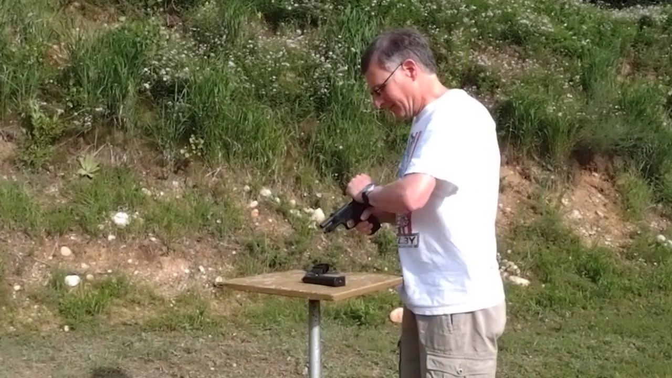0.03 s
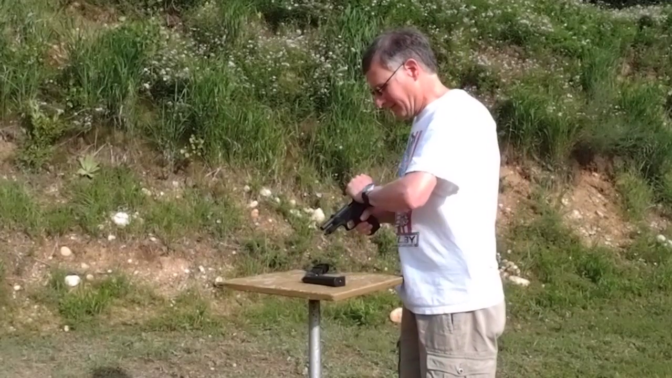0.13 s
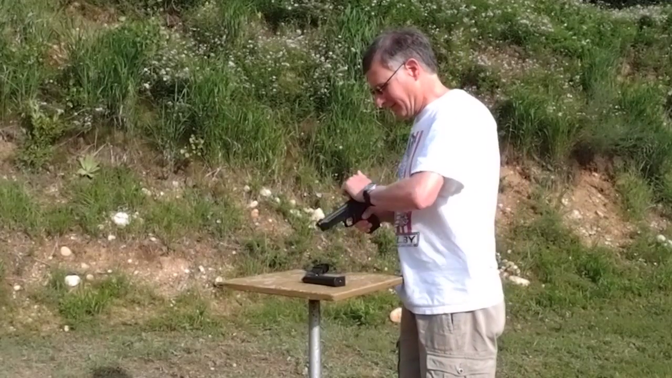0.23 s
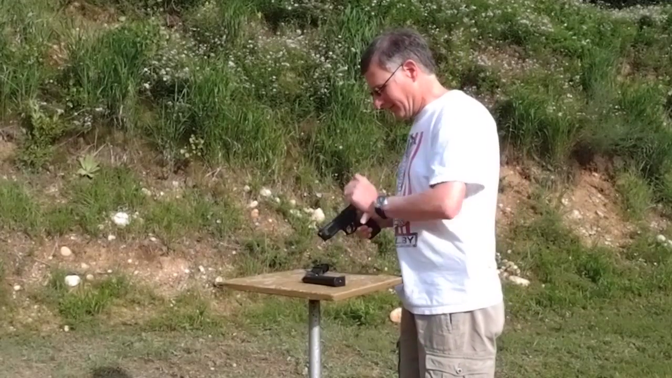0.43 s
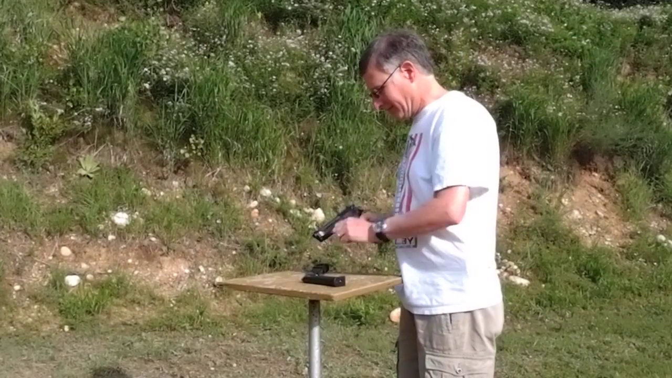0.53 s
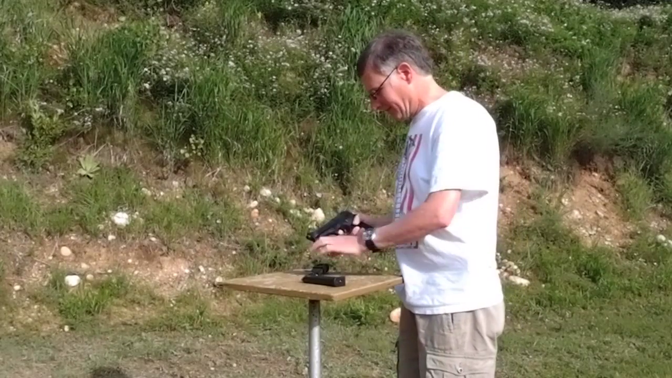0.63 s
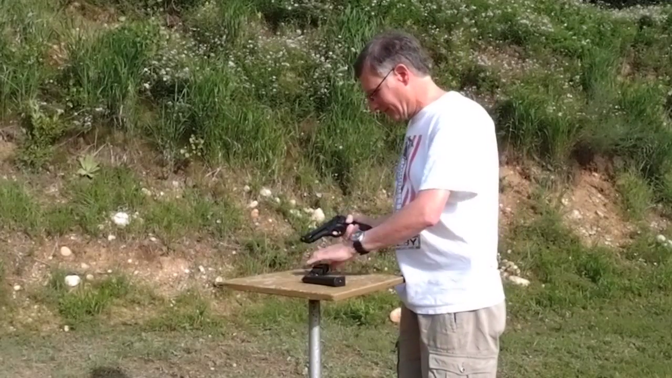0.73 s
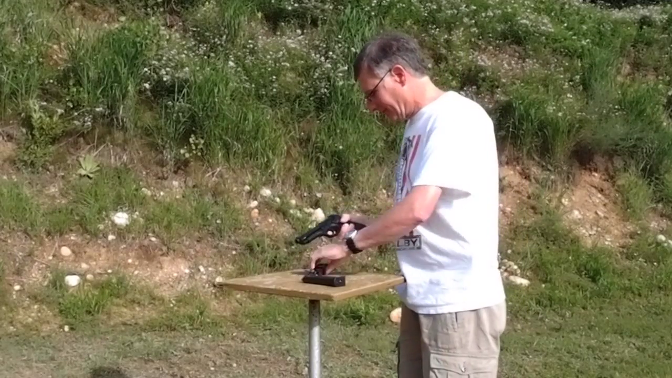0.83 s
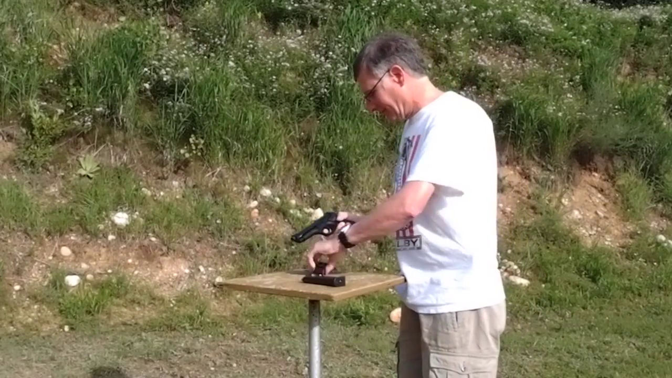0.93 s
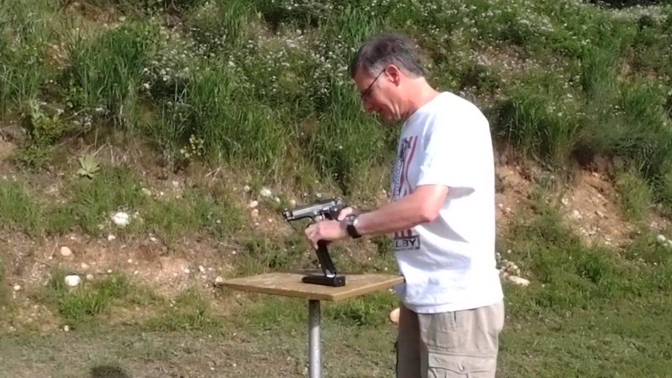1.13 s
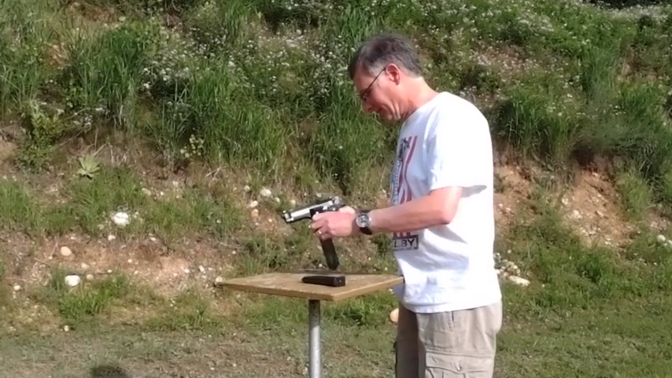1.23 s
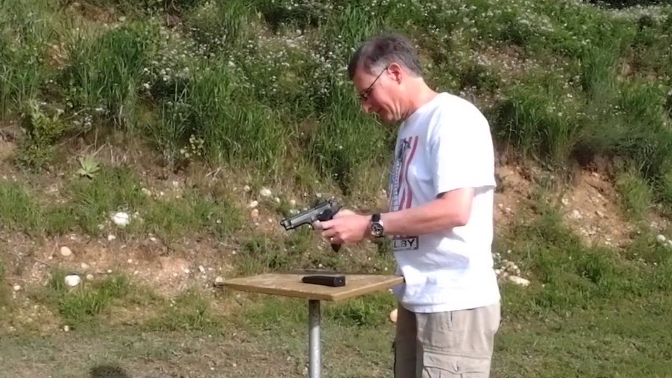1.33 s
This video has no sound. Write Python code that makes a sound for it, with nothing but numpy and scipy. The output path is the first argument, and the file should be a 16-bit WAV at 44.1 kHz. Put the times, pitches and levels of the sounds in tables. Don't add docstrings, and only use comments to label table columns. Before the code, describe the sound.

A pistol slide scrapes briefly and slams shut with a hard, bright metal clack, close to a hand-held microphone outdoors; faint finger ticks and a bird chirp come before, hiss and light wind throughout.

```python
import sys
import numpy as np
from scipy import signal
from scipy.fft import rfft, irfft
from scipy.io import wavfile

SR = 44100
rng = np.random.default_rng(int(sys.argv[2]) if len(sys.argv) > 2 else 0)


def dump_mix(stems):
    frames = np.atleast_2d(stems).T
    limited = np.clip(frames, -1, 1)
    pcm = np.round(limited * 32767).astype(np.int16)
    wavfile.write(sys.argv[1], SR, pcm)


def attenuation_scalar(level_db):
    decades = np.asarray(level_db, float) / 20
    return 10 ** decades


N = 61740

# frequency in Hz, level in dB per Hz.
HISS_COLOUR = [(590, -35.5), (1000, -10), (2260, -6), (6480, -10.5), (9500, -20), (11800, -23),
               (14500, -15), (16000, -13.5)]
# frequency in Hz, level in dB.
HUM_TONES = [(52, -69), (15481, -80.5), (15734, -84)]
# frequency in Hz, level in dB per Hz.
WIND_COLOUR = [(18, -34.5), (30, 2.5), (131, -1), (390, -7), (473, -3.5), (535, -8), (748, -8), (2000, -19),
               (2600, -50), (4400, -120)]
# time in seconds, level in dB.
GUST = [
    (0.0, -61),
    (0.42, -62),
    (0.626, -60),
    (1.044, -57.5),
    (1.4, -60),
]
# start in seconds, length in seconds, start pitch in Hz, end pitch in Hz, level in dB.
CHIRPS = [
    (.122, .012, 3250, 3400, -62),
    (.137, .018, 3700, 3900, -57),
    (.167, .024, 4750, 4680, -60),
]
# start in seconds, length in seconds, start pitch in Hz, end pitch in Hz, level in dB.
HOOT = (1.078, .08, 478, 474, -56)
# delay in seconds, level in dB.
SCATTER = [(.004, -41), (.02, -55.5), (0.044, -53.5), (.054, -49.5), (.075, -56.5), (.14, -61),
           (.19, -71.5), (.21, -66), (0.227, -69), (.25, -75), (.4, -91.5)]
# frequency in Hz, level in dB.
RETURN_COLOUR = [(800, -11), (1700, -10), (2300, -1.5), (4500, -3), (6500, 0.5), (9500, -1), (12500, 1.5),
                 (16000, -1)]
# frequency in Hz, level in dB.
EARLIER_COLOUR = [(1500, -15.5), (2500, -1.5), (4300, -3), (6200, 0.5), (9300, -5), (11500, 0.5),
                  (16000, -2)]
# start in seconds, level in dB, centre in Hz, width in Hz, length in seconds.
TICKS = [(.0480, -45, 2350, 1500, 0.0027), (0.0625, -41.5, 2480, 695, 0.0013),
         (.0740, -40.5, 1253, 149, 0.0016), (0.0744, -41.5, 1540, 150, .002),
         (.0750, -48.5, 3300, 1500, 0.0012), (0.1063, -41, 3400, 1820, .0015),
         (.1070, -47, 1230, 199.8, .003), (.1120, -41, 2430, 1500, .0015), (0.197, -32, 2330, 702, 0.0012),
         (.1972, -33.5, 5460, 4000, .001), (0.2, -42, 2300, 300, 0.0039), (0.2167, -13.5, 3650, 900, .0008),
         (0.2192, -22, 13900, 2000, 0.0019), (.2272, 8.5, 4600, 890, 0.00071),
         (.2350, -12, 2700, 890, .0015), (.9898, -42.5, 6320, 1500, .001), (.9905, -46, 3360, 1785, 0.0023),
         (.9898, -47.5, 12820, 3480, .001), (0.9956, -44, 3160, 2500, .003), (1.081, -55, 2494, 2500, .003),
         (0.988, -47, 1100, 1200, 0.0029), (0.237, -26.5, 500, 501, 0.0013)]
# time in seconds, level in dB.
SCRAPE = [
    (.188, -76),
    (0.192, -52),
    (0.206, -51.5),
    (0.213, -48),
    (.218, -38),
    (0.225, -42.5),
    (.228, -75.5),
]
# start in seconds, level into the frame in dB, level into the slide in dB,
# bare crack in dB, contact length in seconds.
CONTACTS = [
    (.2144, -40.5, -61.5, -33, 0.0012),
    (.2172, -26.5, -47, -31.5, 0.002),
    (.2184, -20, -41.5, -22.5, .0014),
    (.2215, -24, -48.5, -34, .0015),
    (.2272, -4, -12.5, 1, 0.0011),
    (.2300, -16.5, -20, -11.5, 0.0013),
    (.2347, -12, -33.5, -18.5, 0.0023),
    (.2387, -11.5, -3, -5.5, .0009),
    (.2420, -24, -24.5, -16.5, .0015),
    (.2447, -27, -14, -19, .0012),
]
# frequency in Hz, level in dB, 60 dB decay in seconds.
FRAME_MODES = [(1070, -17, .025), (1278, -16.5, 0.09), (1550, -20.5, 0.072), (1840, -22.5, 0.02),
               (2470, -9, 0.022), (2700, -9, 0.014), (3300, -7.5, .014), (3686, -0.5, 0.01),
               (4510, -4.5, .014), (4465, -1.5, 0.013), (5030, -1, .012), (4972, -5, 0.004),
               (5838, -8, 0.016), (6720, -15, .012)]
# frequency in Hz, level in dB, 60 dB decay in seconds.
SLIDE_MODES = [(7310, -13.5, .02), (8092, -6.5, 0.063), (8670, -8.5, .02), (10900, -13.5, .015),
               (11093, -3, 0.02), (11340, -3, 0.016), (12250, -4.5, 0.027), (13300, -8.5, 0.025),
               (14570, -10.5, 0.021)]
# centre in Hz, width in Hz.
NOTCHES = [(5250, 160), (7750, 80)]


def rms_one(x):
    return x / np.sqrt(np.mean(x ** 2) + 1e-20)


def cut(x, hz, kind, order=2):
    return signal.sosfilt(signal.butter(order, hz, kind, fs=SR, output="sos"), x)


def coloured(points):
    hz, db = np.transpose(points)
    grid = np.maximum(np.fft.rfftfreq(N, 1 / SR), 1)
    gain = attenuation_scalar(np.interp(np.log(grid), np.log(hz), db))
    return rms_one(irfft(rfft(rng.standard_normal(N)) * gain, N))


def drift(rate_hz):
    r = np.exp(-2 * np.pi * rate_hz / SR)
    slow = signal.lfilter([1], [1, -2 * r, r * r], rng.standard_normal(N + SR))[SR:]
    return rms_one(slow - slow.mean())


def level_curve(points, outside_db=None):
    s, db = np.transpose(points)
    return np.interp(np.arange(N) / SR, s, db, left=outside_db, right=outside_db)


def recorder_hiss():
    return attenuation_scalar(-60 + 0.4 * drift(8)) * cut(coloured(HISS_COLOUR), 900, "high")


def recorder_hum():
    t = np.arange(N) / SR
    return sum(attenuation_scalar(db) * np.sin(2 * np.pi * hz * t) for hz, db in HUM_TONES)


def wind():
    return attenuation_scalar(level_curve(GUST) + 2.0 + 0.84 * drift(15)) * coloured(WIND_COLOUR)


def far_bird():
    out = np.zeros(N)
    for s, length, start_hz, end_hz, db in CHIRPS + [HOOT]:
        n, i = int(length * SR), int(s * SR)
        phase = 2 * np.pi * np.cumsum(np.linspace(start_hz, end_hz, n)) / SR
        out[i:i + n] += attenuation_scalar(db) * np.hanning(n) * np.sin(phase)
    return out


def bank(clack):
    n = SR // 2
    t = np.arange(n) / SR
    delay, db = np.transpose(SCATTER)
    grain = coloured(RETURN_COLOUR)[:n]
    dull = cut(grain, 9000, "low")
    bright = (grain - dull) * attenuation_scalar(-60 * t / 1.1)
    response = attenuation_scalar(np.interp(t, delay, db, left=-150)) * (dull + bright)
    earlier_length_s, shift = 0.012, int(0.082 * SR)
    earlier = attenuation_scalar(-13) * coloured(EARLIER_COLOUR) * np.exp(-np.arange(N) / SR / earlier_length_s)
    earlier_return = signal.fftconvolve(earlier, response)[shift:shift + N]
    return signal.fftconvolve(clack, response)[:N] + earlier_return


def burst(s, db, length_s):
    out, t = np.zeros(N), np.arange(600) / SR
    i = int(s * SR)
    out[i:i + len(t)] = attenuation_scalar(db) * rng.standard_normal(len(t)) * np.exp(-t / length_s)
    return out


def contacts(column):
    return sum(burst(row[0], row[column], row[4]) for row in CONTACTS)


def knocks():
    out = np.zeros(N)
    for s, db, centre_hz, width_hz, length_s in TICKS:
        r, w = np.exp(-1.5 * np.pi * width_hz / SR), 2 * np.pi * centre_hz / SR
        gain = (1 - r * r) / 2
        stage = [gain, 0, -gain, 1, -2 * r * np.cos(w), r * r]
        level = np.sqrt(SR / (4 * width_hz))
        out += level * signal.sosfilt([stage, stage], burst(s, db, length_s))
    return out


def scrape():
    return attenuation_scalar(level_curve(SCRAPE, -150)) * cut(rng.standard_normal(N), 2200, "high")


def thud():
    hz = 606
    push = np.zeros(N)
    push[int(0.2276 * SR)] = attenuation_scalar(-21.5) * SR / (2 * np.pi * hz)
    return cut(push, hz, "low")


def ring(column, modes):
    out = np.zeros(N)
    for hz, db, t60 in modes:
        if not 7800 < hz < 8300:
            t60 = min(t60, 1 / 42)
        r, w = attenuation_scalar(-60 / (t60 * SR)), 2 * np.pi * hz / SR
        strike = attenuation_scalar(db - 15) * np.sin(w)
        out += signal.lfilter([0, strike], [1, -2 * r * np.cos(w), r * r], contacts(column))
    return out


def gun_body():
    return cut(ring(1, FRAME_MODES) + ring(2, SLIDE_MODES), 958, "high", order=3)


def crack():
    return cut(contacts(3), 1330, "high")


def scene():
    rings = gun_body() + knocks()
    snap = crack()
    echo = bank(attenuation_scalar(-6.5) * rings + attenuation_scalar(4) * snap)
    hiss = recorder_hiss()
    gun = rings + snap + scrape() + thud()
    background = far_bird() + wind() + recorder_hum() + hiss
    return (gun + echo + background)[None]


def band_limit(x):
    return signal.sosfilt(signal.butter(12, 15620, fs=SR, output="sos"), x)


def record(dry):
    x = np.clip(cut(dry, 44, "high", order=6), -1.25, 1.25)
    for hz, width_hz in NOTCHES:
        x = signal.lfilter(*signal.iirnotch(hz, hz / width_hz, fs=SR), x)
    x = signal.sosfilt(signal.ellip(12, 0.5, 60, 15770, fs=SR, output="sos"), x)
    return band_limit(x)


dry = scene()
out = record(dry)
dump_mix(out)
```